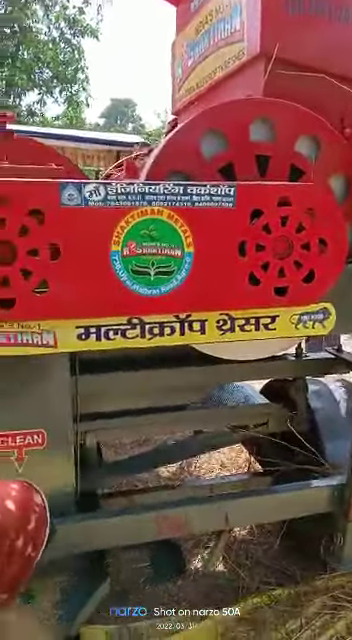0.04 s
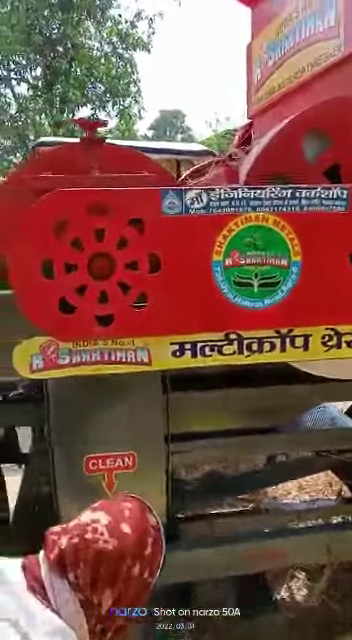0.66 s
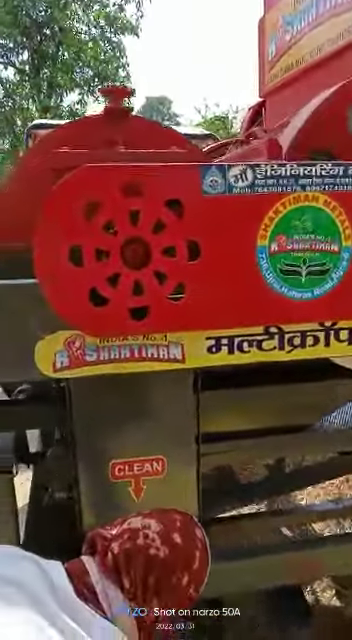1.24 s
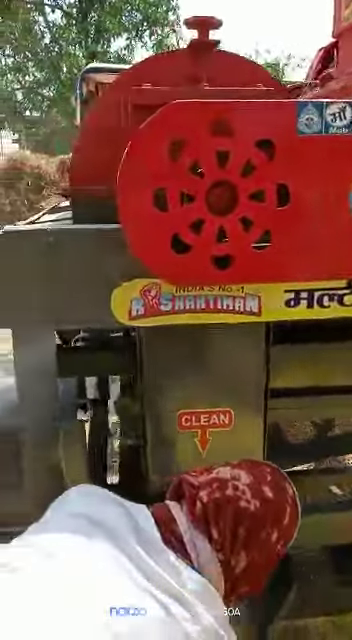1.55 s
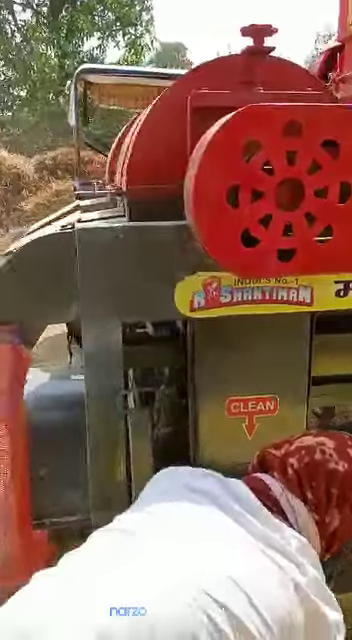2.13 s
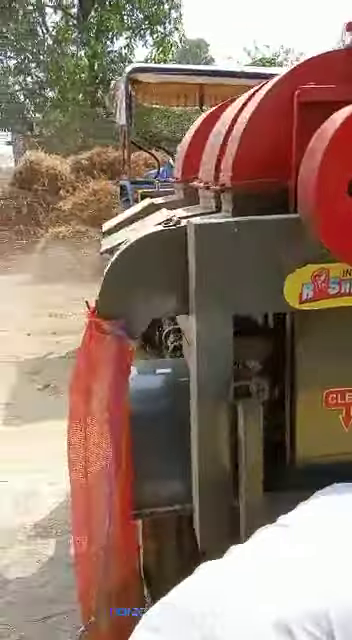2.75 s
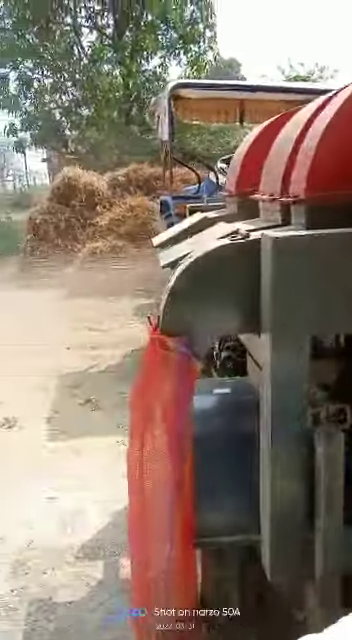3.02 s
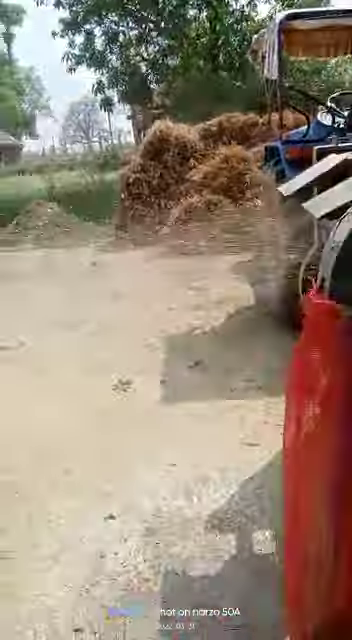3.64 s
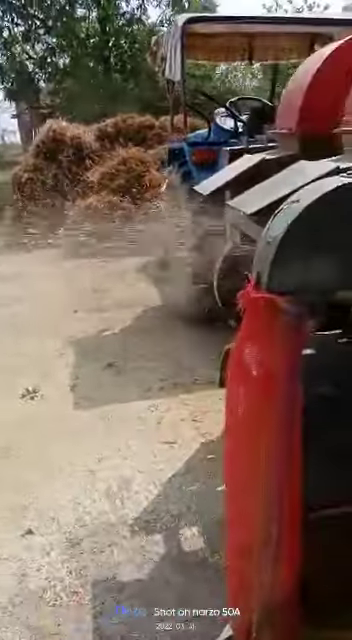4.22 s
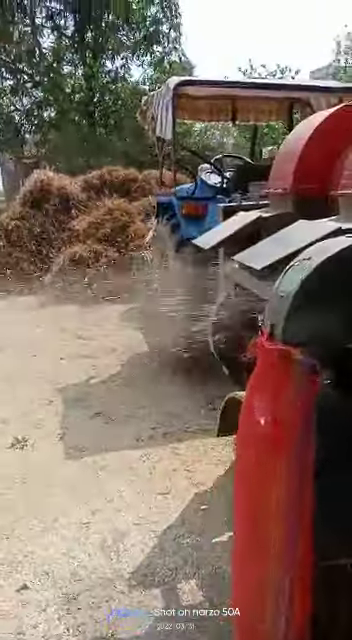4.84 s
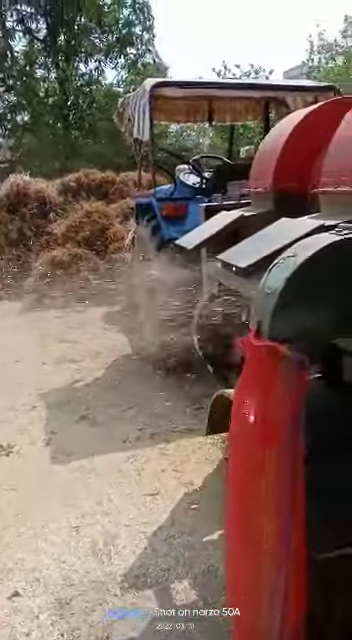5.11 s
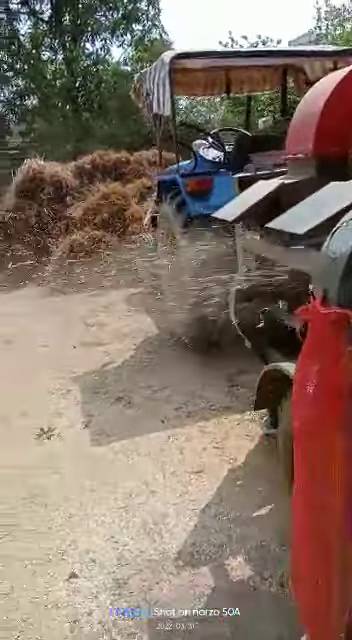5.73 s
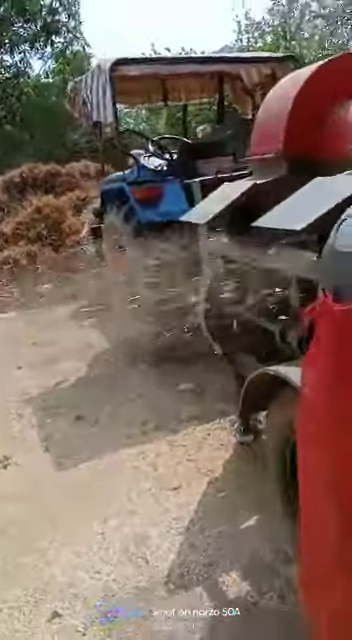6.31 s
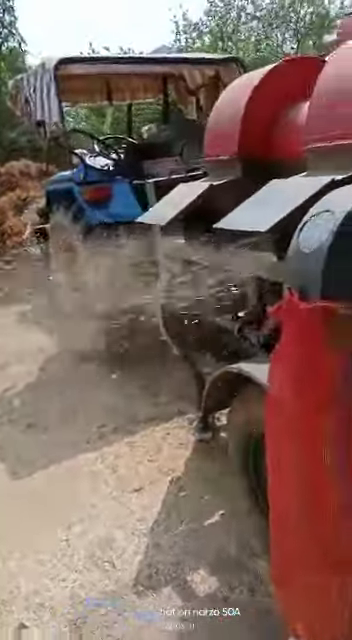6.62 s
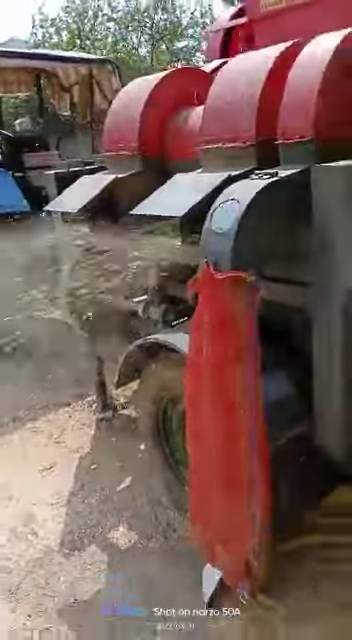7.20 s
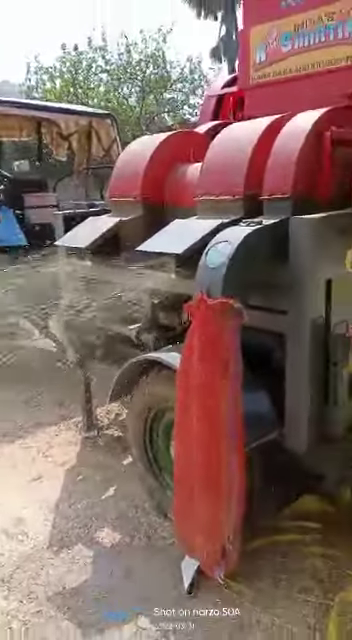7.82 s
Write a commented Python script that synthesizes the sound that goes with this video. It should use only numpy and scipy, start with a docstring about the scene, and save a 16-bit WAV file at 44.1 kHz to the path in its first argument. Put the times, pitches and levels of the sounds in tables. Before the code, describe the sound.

A tractor's diesel engine hums under a roaring threshing machine, with grain pattering on sheet steel and chaff hissing.

```python
"""Tractor driving a threshing machine

A hand-held microphone moves along the machine in a farmyard. The diesel hums under the beat of the
threshing drum and the roar of its blowers; grain patters on sheet steel, chaff hisses from the outlets
and now and then a clump rattles through. The sound cuts in late and drops out once."""
import sys
import numpy as np
from scipy import signal
from scipy.fft import rfft, irfft
from scipy.io import wavfile
from scipy.ndimage import map_coordinates

SR = 44100
rng = np.random.default_rng(int(sys.argv[2]) if len(sys.argv) > 2 else 0)


def put_to_file(sound):
    """Save the sound as 16-bit audio at rate SR, in the file named by the first command-line argument."""
    columns = np.atleast_2d(sound).T  # one column per channel
    safe = np.clip(columns, -1, 1)
    whole_steps = np.round(safe * 32767)
    wavfile.write(sys.argv[1], SR, whole_steps.astype(np.int16))


N = 351036
T = np.arange(N) / SR
CRANK_HZ, CREEP_HZ_PER_S, DRUM_PER_CRANK = 27.19, .018, 9.8 / 27.28


def amp(db):
    """Decibels to gain."""
    return 10 ** (np.asarray(db) / 20)


def unit(x):
    """Scales to rms 1."""
    return x / np.sqrt(np.mean(x ** 2) + 1e-20)


def colour(x, spectrum):
    """Filters by a (frequency [Hz], level [dB]) outline; rms 1."""
    hz, db = np.transpose(spectrum)
    f = np.fft.rfftfreq(N, 1 / SR)
    gain = amp(np.interp(np.log(f + 1), np.log(hz), db))
    return unit(irfft(rfft(x) * gain, N))


def wander(rate_hz):
    """Random drift up to about rate_hz; rms 1."""
    steps = np.arange(0, N / SR + 1, 1 / 500)
    f = np.fft.rfftfreq(len(steps), steps[1])
    spectrum = rfft(rng.standard_normal(len(steps))) / (1 + (f / rate_hz) ** 4)
    return unit(np.interp(T, steps, irfft(spectrum, len(steps))))


def move(middle_s, taken_s):
    """Smooth 0-to-1 step as the microphone changes place."""
    return .5 + .5 * np.sin(np.pi * np.clip((T - middle_s) / taken_s, -.5, .5))


def swells(rows):
    """Sum of Gaussian level bumps in dB."""
    return sum(db * np.exp(-((T - time_s) / half_s) ** 2) for time_s, db, half_s in rows)


def shaft_tones(turns, orders, waver, waver_hz):
    """Tones locked to a shaft; higher orders flutter more."""
    out = np.zeros(N)
    for order, db in orders:
        flutter = waver * order * wander(waver_hz)
        tone = np.cos(2 * np.pi * (order * turns + rng.random()))
        out += np.sqrt(2) * amp(db) * (1 + flutter) * tone
    return out


def resonances(x, modes):
    """Rings parallel modes, each with its stated gain at its centre."""
    out = np.zeros(N)
    for hz, width_hz, db in modes:
        radius = np.exp(-np.pi * width_hz / SR)
        pole = radius * np.exp(2j * np.pi * hz / SR)
        out += amp(db) * 2 * signal.lfilter([1 - radius], [1, -pole], x + 1e-18).real
    return out


def blows(per_s, spread_db):
    """Random clicks, most small, a few large."""
    size = amp(spread_db * np.minimum(rng.exponential(1, N), 4))
    sign = rng.choice([-1, 1], N)
    return size * sign * (rng.random(N) < per_s / SR)


def impacts(per_s, spread_db, ring_s, panels=20):
    """Hail of tiny blows, each briefly ringing one panel; rms 1."""
    t = np.arange(1024) / SR
    hits, panel_of = blows(per_s, spread_db), rng.integers(0, panels, N)
    out = np.zeros(N)
    for k in range(panels):
        ring = rng.standard_normal(len(t)) * np.exp(-t / ring_s)
        out += signal.oaconvolve(hits * (panel_of == k), unit(ring))[:N]
    return unit(out)


def patchy(x, depth_db, width_hz, length_s):
    """Brief flares and hollows at random pitches as the stream shifts over the steel."""
    hz, t, spectra = signal.stft(x, SR, nperseg=512, noverlap=384)
    field = rng.standard_normal((600, 1200))
    where = np.meshgrid(hz / width_hz, t / length_s, indexing="ij")
    flares = unit(map_coordinates(field, where, order=1, mode="wrap"))
    return signal.istft(spectra * amp(depth_db * flares), SR, nperseg=512, noverlap=384)[1][:N]


# (order [x crank speed], level [dB])
EXHAUST_TONES = [(2, -52.5), (3.5, -42), (4, -22), (5, -42), (5.5, -43.5), (6, -34), (7.5, -45), (8, -37),
                 (8.5, -51.5), (9, -54.5), (9.5, -43), (10, -30), (11, -38), (12, -38.5), (14, -51),
                 (16, -46), (18, -49)]


def diesel(crank_turns, near):
    """Exhaust note; the two-turn four-stroke cycle gives half orders."""
    level_db = -1.37 + 2.5 * near + .25 * wander(1.5)
    return amp(level_db) * shaft_tones(crank_turns, EXHAUST_TONES, waver=.027, waver_hz=6.8)


# (order [x drum speed], level [dB])
DRUM_TONES = [(1, -46.5), (4, -57), (8, -42), (12, -45.5), (16, -43), (20, -38), (24, -58), (28, -44.5),
              (32, -46)]


def drum(drum_turns, away):
    """Wavering hum of the spinning threshing drum."""
    level_db = .9 - 1.5 * away + 1.4 * wander(1.2)
    return amp(level_db) * shaft_tones(drum_turns, DRUM_TONES, waver=.0055, waver_hz=4)


# (frequency [Hz], level [dB])
CASING_SPECTRUM = [(20, -30), (45, -21.5), (70, -4), (100, -9), (150, -5.5), (210, 0.5), (260, 3),
                   (320, -0.5), (380, -16), (520, -28.5), (900, -59.5)]


def casing(crank_turns, beaters, near, away):
    """Rumble pulsed by the beaters and by two firings a turn from slightly unequal cylinders."""
    angle = 2 * np.pi * crank_turns
    firing = amp(2.1 * np.cos(2 * angle) + .89 * np.cos(angle) + 1.3 * np.cos(angle / 2))
    level_db = -24.5 - 3.5 * near - 4.5 * away + 2.1 * wander(14)
    return amp(level_db) * colour(firing * beaters * rng.standard_normal(N), CASING_SPECTRUM)


# (frequency [Hz], level [dB])
DRAUGHT_SPECTRUM = [(200, -35), (310, -6.5), (380, 1.5), (450, -1.5), (560, -4), (660, -6.5), (850, -12),
                    (1500, -46)]
# Passing gaps in the frame: (time [s], swell [dB], half length [s])
FRAME_GAPS = [(2.15, 2.5, 0.56), (3.75, 2.5, .35)]


def draught(beaters, near, away):
    """Air chopped by the beaters blows out through gaps in the frame."""
    level_db = -29 - 1.5 * near - 4 * away + swells(FRAME_GAPS) + 2.46 * wander(15)
    return amp(level_db) * colour(beaters * rng.standard_normal(N), DRAUGHT_SPECTRUM)


# (frequency [Hz], bandwidth [Hz], level [dB])
DUCT_MODES = [(761.5, 40, 3.5), (810, 50, -1), (871, 40, 1), (983, 18, -7), (1064, 19, -10.5),
              (1372, 22, -0.5), (1427, 46, -6.5)]


def ducts():
    """Hollow howl of the blower ducts, slightly louder at the gaps."""
    level_db = -30 + .3 * swells(FRAME_GAPS) + 1.9 * wander(14)
    return amp(level_db) * unit(resonances(rng.standard_normal(N), DUCT_MODES))


# (frequency [Hz], level [dB])
BLOWER_SPECTRUM = [(450, -23), (650, -5.5), (900, 2.5), (1100, -0.5), (1230, 1.5), (1500, -1), (1700, 2),
                   (1900, -1), (2250, 0.5), (2900, -17), (5000, -49)]


def blowers(near):
    """Gusty roar of blown air."""
    gusts = patchy(rng.standard_normal(N), depth_db=2.5, width_hz=110.6, length_s=.035)
    level_db = -28 + .33 * near + .5 * wander(25)
    return amp(level_db) * colour(gusts, BLOWER_SPECTRUM)


# (frequency [Hz], level [dB])
GRAIN_SPECTRUM = [(1200, -33), (1900, -16.5), (2250, -6.5), (2550, -1), (2700, -1.5), (2880, -3.5),
                  (3150, -0.5), (3400, -3), (4000, -15), (5000, -27.5), (8000, -44.5)]
# (frequency [Hz], bandwidth [Hz], level [dB])
STEEL_MODES = [(2445, 30, -1.5), (2595, 43, -8), (2740, 45, -2.5), (2827, 68, -1), (2923, 78, 0.5),
               (3187, 52, -4.5), (3696, 55, -8.5), (4140, 53, -16.5), (4470, 86, -22), (7000, 87, -14.5),
               (8040, 140, -12.5), (9330, 81, -21)]


def grain(load_db, feed, outlet):
    """Kernels patter on sheet steel; each mode flares when they land where it moves most."""
    level_db = -26 + .93 * outlet + load_db
    kernels = impacts(per_s=3200, spread_db=2, ring_s=.0039)
    kernels = patchy(kernels, depth_db=2, width_hz=128.2, length_s=.035)
    patter = amp(level_db + .61 * feed) * colour(kernels, GRAIN_SPECTRUM)
    ring = np.zeros(N)
    for mode in STEEL_MODES:
        ring += amp(2.4 * wander(7.3)) * resonances(blows(per_s=450, spread_db=1.5), [mode])
    return patter + amp(level_db - 3) * unit(ring)


# (frequency [Hz], level [dB])
STRAW_SPECTRUM = [(2500, -29.5), (3300, -2), (3900, 3), (4450, 0.6), (5150, -8), (5800, -10), (6400, -9.5),
                  (7150, -8), (7550, -6.5), (8000, -7.5), (8800, -8.5), (9300, -16.5), (9900, -25),
                  (15000, -36)]


def straw(load_db, feed, outlet, near):
    """Stalks strike the steel in a bright rustle."""
    level_db = -32 + .6 * near + 3 * outlet + .7 * load_db + .62 * feed
    stalks = impacts(per_s=3000, spread_db=1, ring_s=.0041)
    stalks = patchy(stalks, depth_db=2, width_hz=220, length_s=.025)
    return amp(level_db) * colour(stalks, STRAW_SPECTRUM)


# (frequency [Hz], level [dB])
CHAFF_SPECTRUM = [(7000, -11.5), (10000, -8), (10800, -12.5), (11400, -6), (12200, -10), (13000, -2.5),
                  (13600, -.5), (14600, 2), (15700, -5.5), (17000, -8.5)]


def chaff(load_db, feed):
    """Husk impacts merge into a hiss, louder once the microphone enters the chaff."""
    level_db = -37 + 3.7 * move(middle_s=6.7, taken_s=.35) + .6 * load_db + .55 * feed
    husks = impacts(per_s=7000, spread_db=2.7, ring_s=.0025)
    return amp(level_db) * colour(husks, CHAFF_SPECTRUM)


# (time [s], grain swell [dB], half length [s])
HEAVY_ARMFULS = [(.45, 0.5, 0.12), (3.39, 3, 0.14), (6.25, 0.5, .25), (6.9, 1, 0.54)]


def crop(near):
    """Grain, straw and chaff share one uneven feed; an outlet comes into earshot, then is hidden."""
    outlet = move(middle_s=3.47, taken_s=.7) - move(middle_s=7.34, taken_s=.82)
    load_db, feed = swells(HEAVY_ARMFULS), wander(17)
    return grain(load_db, feed, outlet) + straw(load_db, feed, outlet, near) + chaff(load_db, feed)


# (time [s], level [dB], decay [s], relative straw level [dB])
CLUMP_HITS = [(.497, -24.5, .025, -12), (2.253, -21.5, .01, -12), (2.836, -35, .018, 0),
              (3.06, -24, 0.06, -8), (3.455, -24, 0.02, -8), (3.81, -23, 0.026, -2),
              (4.445, -27, 0.026, 4.5), (5.08, -24, .013, 1), (6.105, -25.5, 0.056, 3),
              (6.241, -12, .02, -12.5), (6.462, -25.5, 0.017, 7.5), (6.534, -30, .02, 4),
              (7.245, -29, .025, 7.5), (7.275, -23, .013, -4)]


def clumps(rise_per_decay=.21, puff_db=-39, centre_hz=2850, db_per_octave=-15):
    """Clumps hit the casing: kernels ring the steel, with a splash of straw and a puff of chaff."""
    knock, splash, puff = np.zeros((3, N))
    for time_s, db, decay_s, straw_db in CLUMP_HITS:
        shower = np.exp(-np.maximum((time_s - T) / rise_per_decay, T - time_s) / decay_s)
        knock += amp(db) * shower
        splash += amp(db + straw_db) * shower
        puff += amp(puff_db) * shower
    modes = [(hz, width_hz, db + db_per_octave * abs(np.log2(hz / centre_hz)))
             for hz, width_hz, db in STEEL_MODES]
    kernels = blows(per_s=8100, spread_db=1)
    clink = amp(1) * resonances(knock * kernels, modes) / np.std(resonances(kernels, modes))
    clatter = amp(-8.5) * knock * colour(kernels, GRAIN_SPECTRUM)
    stalks = impacts(per_s=3000, spread_db=2.5, ring_s=.00085, panels=8)
    spray = splash * colour(stalks, STRAW_SPECTRUM) + puff * colour(stalks, CHAFF_SPECTRUM)
    return clink + clatter + spray


def scene():
    """Tractor and thresher, the same in both channels."""
    crank_turns = np.cumsum(CRANK_HZ + CREEP_HZ_PER_S * T) / SR
    drum_turns = crank_turns * DRUM_PER_CRANK
    beaters = amp(np.cos(2 * np.pi * 8 * drum_turns))  # 8 beats a turn, +/-1 dB
    near = move(middle_s=2.2, taken_s=1.9)  # towards the tractor
    away = move(middle_s=6.78, taken_s=1)  # from the casing
    mono = diesel(crank_turns, near) + drum(drum_turns, away)
    mono += casing(crank_turns, beaters, near, away)
    mono += draught(beaters, near, away) + ducts() + blowers(near)
    mono += crop(near) + clumps()
    return np.array([mono, mono])


# Sound on: (start [s], end [s])
LIVE_SPANS = [(.1575, 2.3763), (2.6455, 9)]


def record(dry, cutoff_hz=15750):
    """Hard on/off gate, then low-pass."""
    live = sum((T >= start_s) & (T < end_s) for start_s, end_s in LIVE_SPANS)
    lowpass = signal.firwin(511, cutoff_hz, window=("kaiser", 9), fs=SR)
    return signal.oaconvolve(dry * live, lowpass[None], "same", axes=1)


dry = scene()
out = record(dry)
put_to_file(out)
```